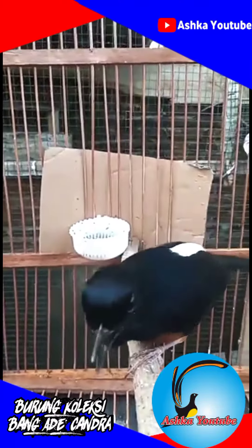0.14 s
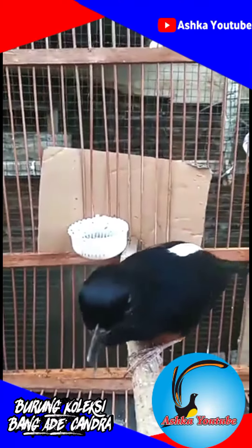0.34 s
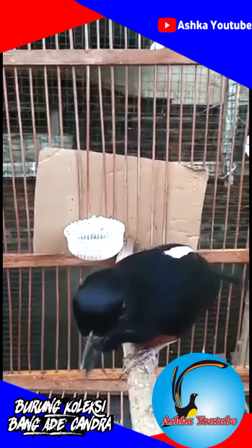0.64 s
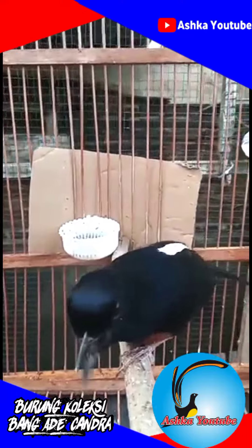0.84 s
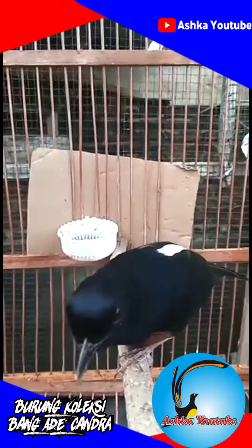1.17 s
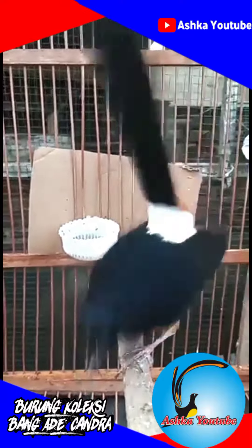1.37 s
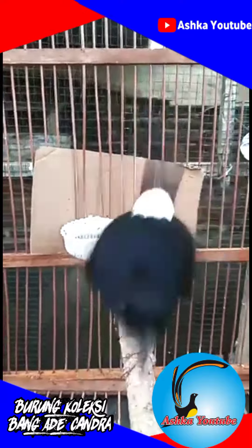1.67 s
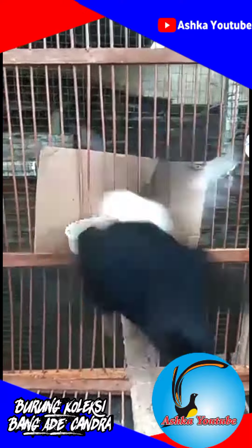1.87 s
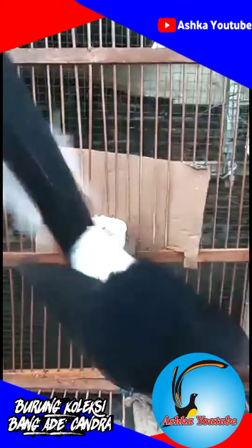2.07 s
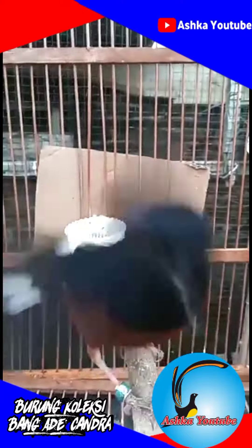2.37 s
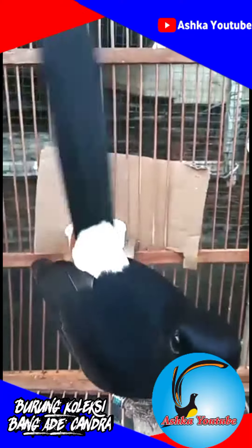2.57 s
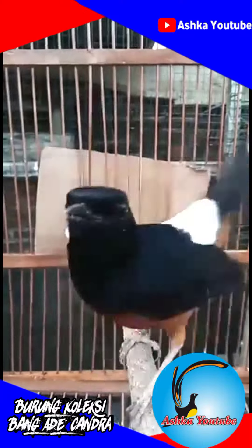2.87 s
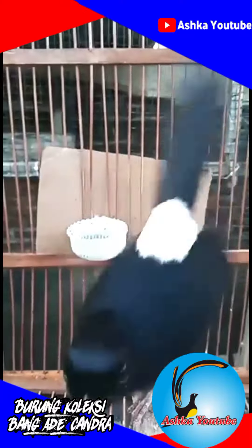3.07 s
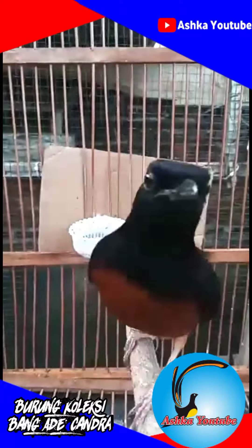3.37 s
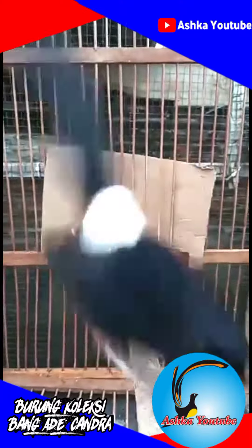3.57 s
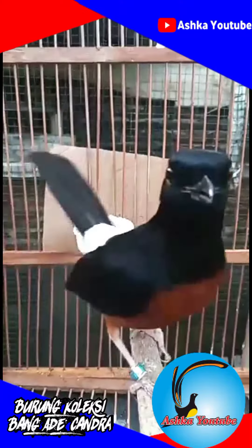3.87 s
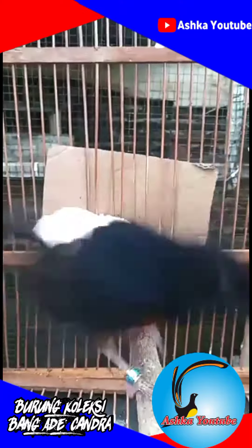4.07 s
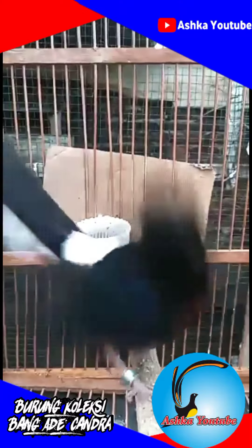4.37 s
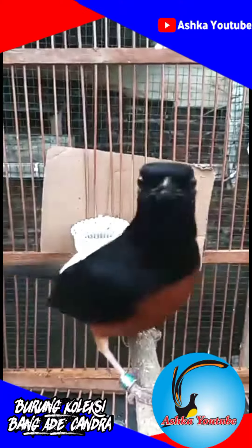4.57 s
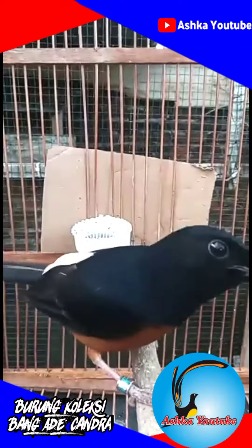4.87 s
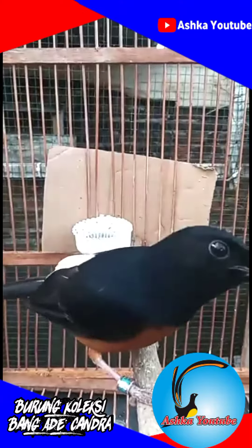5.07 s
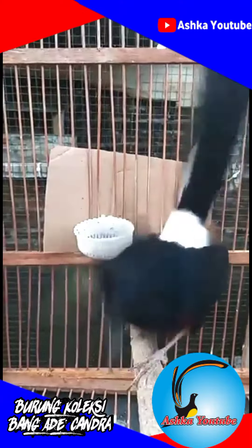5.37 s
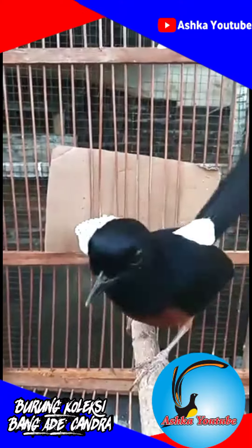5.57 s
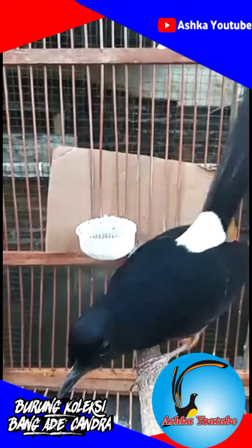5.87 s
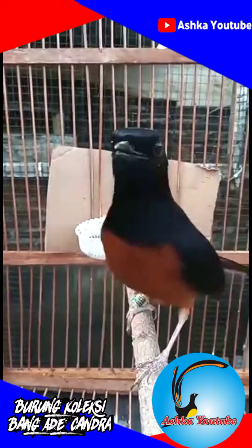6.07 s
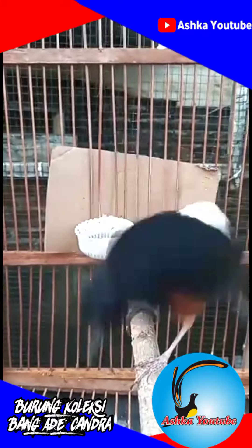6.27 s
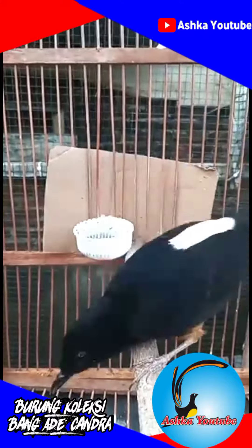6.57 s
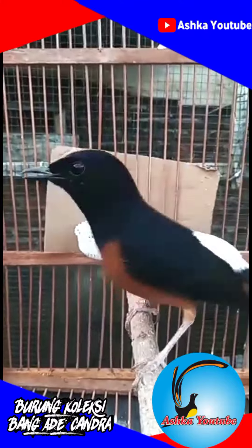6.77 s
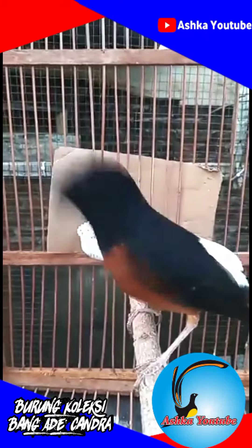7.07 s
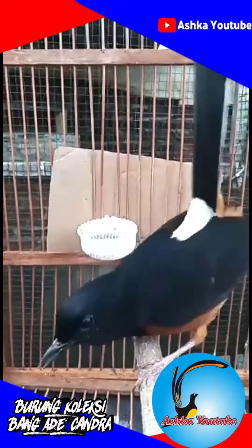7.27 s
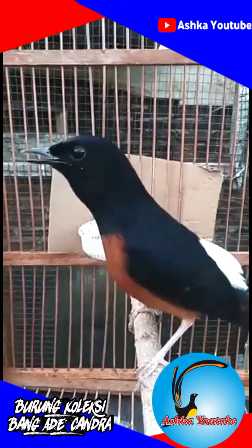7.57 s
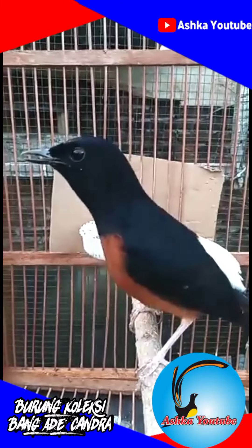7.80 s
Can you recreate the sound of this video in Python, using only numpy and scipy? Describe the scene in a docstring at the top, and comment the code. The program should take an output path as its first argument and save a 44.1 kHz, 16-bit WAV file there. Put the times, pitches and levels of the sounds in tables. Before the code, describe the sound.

A close caged songbird warbles rapidly, then alternates dry clicks with short rising whistles, and finally throws out piercing, scratchy upward squeals.

```python
"""Caged songbird close to a phone microphone

Close up, in a porch's echo: swinging tones warble, near-pure tones whistle and two coupled tones squeal.
Shaped noise makes the dry clicks, chopped throat rasps, breathy puffs, feather swishes and air thumps;
damped knocks are feet on the perch. Far off in the yard, soft tones make a dove and small birds, harmonics
a rooster and pulsed bands a trill, over a bed of patchy noise: traffic rumble, murmur and twitter.
"""
import sys
import numpy as np
from scipy import signal
from scipy.fft import rfft, irfft, next_fast_len
from scipy.io import wavfile
from scipy.ndimage import uniform_filter1d, map_coordinates

SR = 44100
rng = np.random.default_rng(int(sys.argv[2]) if len(sys.argv) > 2 else 0)


def int16_out(signal):
    """Quantize to a 16-bit WAV file."""
    q = np.round(np.clip(np.atleast_2d(signal).T, -1, 1) * 32767)
    wavfile.write(sys.argv[1], SR, q.astype(np.int16))


N = 350154  # samples

# Levels and spectra are relative: the functions add trims or set the noise to rms 1.
# Yard beds, spectra of traffic rumble, middle murmur and distant small birds: (frequency [Hz], level [dB])
RUMBLE_SPECTRUM = [(12, -53.5), (20, -39), (146, -1.5), (315, -8), (510, -14), (694, -28), (809, -19),
                   (1200, -36.5), (1560, -60.5), (2640, -120)]
MURMUR_SPECTRUM = [(410, -32), (700, -5), (806, -16.5), (2190, -3.5), (2380, -14.5), (3800, -8.5),
                   (4940, -25.5), (8360, -120)]
TWITTER_SPECTRUM = [(2000, -55), (3400, -31), (4090, -11.5), (5320, 6), (6270, -17), (6870, -8),
                    (7890, -10.5), (11000, -28.5), (13400, -29.5), (15600, -44.5), (16400, -60)]
# Rise and fall of the three beds: (time [s], level [dB])
RUMBLE_LEVEL = [(0, -58), (.8, -61.5), (1.3, -62), (2.8, -64.5), (3.2, -62), (4.1, -64), (5.1, -60),
                (5.9, -56), (6.2, -64), (6.4, -56.5), (7.05, -63), (7.94, -64)]
MURMUR_LEVEL = [(0, -53.5), (.5, -59.5), (1.5, -68), (2.8, -68.5), (4.3, -67.5), (5.9, -68.5), (7, -71.5),
                (7.94, -71)]
TWITTER_LEVEL = [(0, -59), (.95, -74.5), (2.79, -68.5), (3.16, -80.5), (3.78, -77), (4.02, -66),
                 (4.49, -77.5), (5.06, -57), (5.2, -64.5), (5.9, -71), (6.39, -52.5), (6.68, -57),
                 (6.81, -63), (7.43, -56), (7.61, -57.5), (7.94, -55)]

# Low close whistles, small birds far off, rising whistles, one short low note and far dove coos:
# (start [s], length [s], reference pitch [Hz], reference level [dB])
COOS = [(-.008, 0.039, 1184, -18), (0.15, 0.037, 1150, -15), (0.365, .042, 1131, -15),
        (0.6, 0.031, 1150, -16)]
PEEPS = [(0, 0.06, 4600, -49), (0.075, 0.036, 4730, -35.5), (0.145, 0.056, 4750, -38.5),
         (0.23, 0.034, 4820, -48), (0.3, 0.042, 4540, -47), (0.38, .03, 5500, -55),
         (0.54, .035, 4220, -43.5), (0.69, .04, 4120, -51.5), (0.92, 0.033, 5420, -45.5),
         (1.12, 0.026, 3664, -35.5), (1.98, 0.085, 4760, -55), (2.19, 0.09, 4810, -58),
         (2.65, 0.075, 5540, -57)]
WHISTLES = [(1.567, 0.17, 2300, -30), (1.893, 0.18, 2321, -31.5), (2.2, 0.18, 2320, -32),
            (2.503, 0.18, 2307, -32), (2.852, 0.19, 2296, -31.5), (3.348, .2, 2272, -31)]
CHIP = [(3.964, 0.022, 1444, -37.5)]
DOVE = [(1.36, 0.093, 1010, -56.5), (1.63, 0.11, 1000, -58), (2.03, 0.056, 540, -58),
        (2.55, 0.15, 1190, -60.5), (3.11, 0.082, 625, -51.5), (3.24, .1, 648, -49.5),
        (3.37, 0.059, 655, -57.5), (3.48, 0.18, 635, -55.5), (6.105, 0.053, 1060, -60.5)]
# Their shapes; the rising whistle is a low step, a jump, then a slowing climb:
# (share of length [0-1], pitch ratio [1], relative level [dB])
COO_SHAPE = [(0, 0.9, -14), (.25, 0.98, -4), (.45, 0.98, 2.5), (.8, 0.95, -3), (1, 0.91, -10)]
PEEP_SHAPE = [(0, 1, -14), (.5, 1, 3.5), (1, 0.94, -11.5)]
WHISTLE_SHAPE = [(0, .7, -21), (.08, .72, -2.5), (0.171, .72, -9.5), (0.199, 0.99, -26.5),
                 (.25, 0.79, -8.5), (.32, .91, -4), (.42, 0.92, -1.5), (.6, 0.96, -3.5), (.83, 0.98, -7),
                 (1, 0.96, -30)]
CHIP_SHAPE = [(0, 1.33, -29), (.3, 1.05, 0), (.8, .96, -1.5), (1, .93, -22)]
DOVE_SHAPE = [(0, .98, -3.5), (.3, 1, -4), (1, 1.02, -10)]
# One rising dove coo and one far rising note: (time [s], pitch [Hz], level [dB])
DOVE_RISE = [
    [(4.7, 621, -66.5), (4.826, 811, -47.5), (4.9, 799, -67.5)],
]
FAR_RISE = [
    [(5.52, 1789, -65.5), (5.598, 2260, -58), (5.65, 2290, -61)],
]

# Warbled phrases: (time [s], centre pitch [Hz], level [dB])
WARBLES = [
    [(0.032, 1920, -13.5), (0.068, 1932, -8), (0.1, 1252, -19.5)],
    [(0.193, 2140, -12), (0.225, 1870, -8), (0.254, 1377, -16.5), (0.262, 2485, -28), (0.279, 2376, -7),
     (0.318, 1400, -18.5)],
    [(0.408, 2017, -12), (0.444, 1831, -6.5), (0.478, 1509, -17), (0.498, 2430, -9), (0.555, 2207, -23.5)],
    [(0.633, 1904, -9.5), (0.671, 1965, -7.5), (0.697, 1578, -16.5)],
    [(0.736, 3076, -18.5), (0.743, 2796, -9), (0.775, 2008, -11.5), (0.805, 1690, -14.5),
     (0.82, 2474, -13.5), (0.845, 3652, -11), (0.857, 3810, -12.5), (0.872, 3360, -26)],
    [(0.956, 2222, -15.5), (0.979, 1795, -6.5), (1.01, 1516, -18.5), (1.035, 2520, -12),
     (1.055, 2990, -13.5), (1.07, 2995, -23.5)],
]
# How much of the full wobble each phrase takes: (share [0-1])
WARBLE_SHARE = [0.55, 0.99, .65, 0.26, .7, 0.34]
# Faint flutters above the whistle ends: (start [s], length [s], reference pitch [Hz], reference level [dB])
FLUTTERS = [(1.72, 0.074, 2537, -32), (2.045, 0.038, 2517, -35.5), (2.348, 0.057, 2530, -38.5),
            (2.63, 0.072, 2523, -39), (3.0, 0.043, 2534, -54.5)]
# Shape of a flutter: (share of length [0-1], pitch ratio [1], relative level [dB])
FLUTTER_SHAPE = [(0, .98, -6), (.25, 1, 2), (0.998, 1.02, -27.5)]
# Thin treble and octave overtone under the tone: (pitch [Hz], relative level [dB])
TREBLE_BY_PITCH = [(1300, -40.5), (1650, -30), (1900, -20.5), (2400, -14.5), (4000, -18.5)]
OCTAVE_BY_PITCH = [(1500, -39), (3000, -35), (3800, -18.5)]
# Thin treble noise over the warbles: (frequency [Hz], level [dB])
WARBLE_TREBLE_SPECTRUM = [(1760, -37), (3000, -17), (3710, -15.5), (4340, -23), (6020, -26), (9610, -25.5),
                          (10400, -7.5), (12200, -8), (15400, -31.5), (16400, -58)]
WARBLE_HZ, WARBLE_DEPTH_HZ = 97.35, 252  # mean teeth a second; pitch swing per unit of tooth at share 1
FLUTTER_SHARE, FLUTTER_TREBLE_DB = 0.34, -36  # share of the full wobble; treble relative to the tone
THIN_HZ = 10400  # mean pitch of a thin, unsteady treble tone, heard also shifted up by the song pitch

# Feather swishes, and at 1.12 s a breathy noise under a short high note: (peak time [s], rise time [s], fall
# time [s], level [dB])
SWISHES = [(0.6, 0.086, 0.091, -34.5), (0.94, 0.028, .02, -46), (1.12, .05, 0.021, -37.5),
           (1.31, 0.11, 0.079, -36.5), (3.81, .03, 0.037, -57)]
# Thumps of pushed air: (peak time [s], rise time [s], fall time [s], level [dB], brighter flap level [dB])
THUMPS = [(0.62, .12, 0.046, -57, -42), (1.294, 0.051, .14, -48.5, -42.5), (3.645, 0.055, 0.11, -51.5, -52),
          (3.8, 0.023, 0.041, -36, -47.5), (3.869, .2, 0.16, -43.5, -64), (4.65, 0.091, 0.12, -56, -65.5),
          (5.299, 0.047, 0.042, -63, -43.5), (5.33, 0.19, 0.13, -47, -68), (7.4, 0.18, 0.28, -40, -52.5)]
# Feet on the perch: (time [s], level [dB])
KNOCKS = [(0.692, -29.5), (0.743, -47), (0.961, -37.5), (1.027, -46.5), (3.802, -34), (5.292, -35.5)]
# Spectra of feathers, low thump and brighter flap: (frequency [Hz], level [dB])
FEATHER_SPECTRUM = [(2000, -45.5), (3400, -8), (4420, -5.5), (7290, -4.5), (11200, -12), (14900, -10.5),
                    (15900, -16.5), (16400, -83)]
THUMP_SPECTRUM = [(24, -44), (45, -21), (100, -7.5), (190, 1.5), (300, -1.5), (450, -18.5), (800, -39.5),
                  (1500, -100)]
FLAP_SPECTRUM = [(150, -60.5), (280, -12.5), (450, 0.5), (800, -1.5), (1150, -17), (1800, -34),
                 (3300, -100)]
SWELL_DB, KNOCK_HZ = 26, 482  # drop of a swell over one rise or fall time; knock frequency

# Left side of two separate two-voiced notes: (time [s], pitch [Hz], level [dB], octave level [dB])
LEFT_NOTES = [
    [(1.205, 2592, -50.5, -74), (1.225, 2644, -32, -82), (1.3, 2660, -40.5, -51.5),
     (1.37, 2660, -30.5, -75), (1.44, 2646, -61, -99)],
    [(5.42, 2917, -47, -91), (5.444, 2893, -33.5, -48.5), (5.478, 3122, -47, -44), (5.586, 4196, -26, -44),
     (5.61, 4444, -44, -64)],
]
# Right side of those notes: (time [s], pitch [Hz], level [dB], treble level [dB])
RIGHT_NOTES = [
    [(1.21, 2947, -40, -90), (1.22, 3113, -41.5, -76.5), (1.288, 3109, -41.5, -57),
     (1.33, 2993, -35.5, -60), (1.43, 2876, -63, -90)],
    [(5.465, 5500, -48.5, -56), (5.49, 4958, -32, -58), (5.505, 5190, -31.5, -61), (5.53, 5414, -40.5, -68),
     (5.58, 5846, -56, -74), (5.62, 6142, -68, -70)],
]
# Right side of the rising squeals: (time [s], pitch [Hz], level [dB])
SQUEALS = [
    [(4.879, 4183, -51), (4.897, 4735, -21), (5.031, 6734, -37), (5.055, 6950, -46.5)],
    [(6.016, 4278, -39), (6.03, 4790, -24), (6.092, 5430, -25.5), (6.15, 5960, -24.5), (6.186, 6300, -32.5),
     (6.22, 6720, -30.5), (6.275, 6560, -33), (6.289, 5680, -24), (6.33, 5245, -33.5)],
    [(6.842, 4378, -42), (6.861, 5080, -25), (6.961, 5920, -24.5), (7.0, 6056, -33.5), (7.104, 6800, -30.5),
     (7.14, 6620, -23.5), (7.15, 6304, -23)],
    [(7.6, 4827, -39), (7.616, 5112, -20.5), (7.644, 5467, -24), (7.724, 6137, -30.5), (7.772, 6840, -28),
     (7.8, 7051, -41)],
]
# What goes with the right pitch: (pitch [Hz], left level [dB], left octave level [dB], treble level [dB])
SQUEAL_COLOUR = [(4000, -87.5, -62, -65), (4200, -51, -48, -64), (5300, -56, -64, -66.5),
                 (5870, -57.5, -50.5, -53.5), (6080, -47.5, -54, -35.5), (6590, -45.5, -33, -38),
                 (6870, -66, -57, -51)]
# Right pitch over left pitch in each squeal, before left dips are held up: (ratio [1])
SIDES_APART = [1.66, 1.64, 1.61, 1.57]
# Tones made where the sides couple: (multiple of left pitch [1], multiple of right pitch [1], level [dB])
MIXING = [(3, 0, -30), (1, 1, -7), (-1, 2, -22), (0, 2, -9.5), (2, 1, -17)]
# The beak's response to the coupled tones: (frequency [Hz], gain [dB])
BEAK_RESPONSE = [(1000, -22), (6000, -19), (8500, 11), (9600, -5), (10500, -24), (12500, -15), (14000, -15),
                 (15000, -41)]
# Patchy treble noise over the squeals: (frequency [Hz], level [dB])
SQUEAL_TREBLE_SPECTRUM = [(6350, -78.5), (10800, -49.5), (11600, 6), (13100, 17.5), (13900, 5),
                          (15800, -37), (16400, -83)]
SQUEAL_ROUGH = 0.59  # share of full roughness, 0-1

# Dry clicks: (time [s], peak level [dB], low part level [dB])
CLICKS = [(1.4854, -11.5, -17.5), (1.7109, -9, -16), (1.933, -5, -20), (2.468, -6.5, -15.5),
          (2.831, -6, -26.5), (3.0758, -7.5, -15), (3.6085, -4.5, -18), (5.2532, -7, -22.5),
          (5.7771, -5.5, -16.5), (6.864, -32.5, -33.5), (7.614, -26.5, -27)]
# Colour of the clicks: (frequency [Hz], level [dB])
SNAP_SPECTRUM = [(290, -53), (500, -33), (910, -1.5), (2120, -12.5), (3860, -11), (4530, -17), (6920, 0.5),
                 (7550, -9.5), (8740, -4.5), (10900, -29), (12600, -13), (15200, -30), (16400, -46)]

# Harsh rasps: (time [s], level [dB])
RASPS = [
    [(4.61, -46), (4.628, -20.5), (4.646, -22), (4.654, -32), (4.662, -16.5), (4.69, -47)],
    [(7.525, -35), (7.539, -17.5), (7.577, -20), (7.6, -37.5)],
]
# Throat noise: (frequency [Hz], level [dB])
THROAT_SPECTRUM = [(290, -76), (500, -39), (690, -20.5), (969, -4.5), (1310, 3.5), (1760, -1.5),
                   (2100, -13), (2280, -6), (2740, -24.5), (3030, -19), (3810, -50), (4500, -45),
                   (5850, -69), (9900, -120)]
RASP_TREBLE_DB = -22

# Far rooster: (time [s], pitch [Hz], level [dB])
ROOSTER = [
    [(5.24, 807, -57), (5.276, 861, -53), (5.338, 805, -59), (5.55, 799, -57)],
    [(5.575, 453, -59.5), (5.641, 505, -59.5), (5.83, 507, -54), (5.947, 481, -62), (6.09, 524, -69)],
    [(7.4, 553, -68), (7.48, 578, -54), (7.535, 586, -36)],
]
# Harmonics that carry from the crow: (harmonic number [1], level [dB])
CROW_HARMONICS = [(2, -5.5), (3, -5.5), (4, -9), (5, -11.5)]
# Distance takes the top off the crow: (frequency [Hz], gain [dB])
CROW_DISTANCE = [(2500, 3), (3100, -9)]

# Breathy ends of the long squeals: (start [s], length [s], reference level [dB])
PUFFS = [(6.285, 0.039, -28.5), (7.145, 0.032, -31)]
# Fade of a puff: (share of length [0-1], relative level [dB])
PUFF_FADE = [(0, 1.5), (1, -18.5)]
# Unvoiced air: (frequency [Hz], level [dB])
PUFF_SPECTRUM = [(1500, -48.5), (2200, -32.5), (5500, 9), (9000, -1), (10200, -37), (12500, -4),
                 (14500, -44)]

# Far trilling bird: (start [s], length [s], reference level [dB])
TRILL = [(6.36, 0.71, -57), (7.2, 0.37, -56.5), (7.82, .12, -47.5)]
# Fade of a trill: (share of length [0-1], relative level [dB])
TRILL_FADE = [(0, 6), (.4, -4), (.9, -7.5), (1, -13)]
# Bands of the trill: (centre pitch [Hz], relative level [dB])
TRILL_BANDS = [(5450, 7), (6650, 1), (7200, -0.5), (9000, -11)]
TRILL_HZ = 20.54  # notes a second

# Decay of the porch's answer: (frequency [Hz], time to fall 60 dB [s])
WALL_DECAY = [(500, 0.083), (2000, 0.12), (5500, 0.28), (9000, 0.19), (14000, 0.017)]
TOP_HZ = 16500  # band limit of the microphone


def amp(db):
    """Gain of a level in dB."""
    return 10 ** (np.asarray(db) / 20)


def unit(x):
    """x at rms 1."""
    return x / np.sqrt(np.mean(x ** 2) + 1e-20)


def along(points, hz):
    """Value at hz, from (Hz, value) points joined on a log frequency axis."""
    f, v = np.transpose(points)
    return np.interp(np.log(hz + 1), np.log(f + 1), v)


def notes(tables, edge=0.0016):
    """A gate with soft edges of edge seconds, then a smooth curve for each column after the time."""
    t = np.arange(N) / SR
    gate = np.zeros(N)
    for rows in tables:
        start, end = rows[0][0], rows[-1][0]
        on = slice(max(round((start - edge) * SR), 0), round((end + edge) * SR))
        nearest_end = np.minimum(t[on] - start, end - t[on])
        gate[on] += np.clip(nearest_end / edge + .5, 0, 1)  # touching notes cross-fade
    rows = np.concatenate(tables)
    s, *values = rows[np.argsort(rows[:, 0], kind="stable")].T
    curves = (uniform_filter1d(np.interp(t, s, v), size=130) for v in values)
    return np.minimum(gate, 1), *curves


def sung(events, shape):
    """One table per event: the shape stretched to its length, moved to its pitch (if any) and level."""
    return [[(s + length * share, *np.multiply(hz, ratio), db + rel_db) for share, *ratio, rel_db in shape]
            for s, length, *hz, db in events]


def swells(events):
    """The sum of gains that climb to a peak and die away, straight in dB."""
    t = np.arange(N) / SR
    return sum(amp(db - SWELL_DB * np.maximum((s - t) / abs(rise), (t - s) / abs(fall)))
               for s, rise, fall, db in events)


def wobble(rate):
    """A smooth random curve, rate knots a second."""
    knots = rng.standard_normal(int(N * rate / SR) + 4)
    return map_coordinates(knots, [np.arange(N) * rate / SR])


def phase(hz):
    """Running phase of a pitch curve."""
    return 2 * np.pi * np.cumsum(hz) / SR


def filtered(x, response):
    """x times a response of frequency."""
    m = next_fast_len(N + 8192)
    return irfft(rfft(x, m) * response(np.fft.rfftfreq(m, 1 / SR)), m)[:N]


def hiss(spectrum, patchy_db=0, tall=4, long=10):
    """Coloured noise of rms 1; patches of random gain, tall in bins and long in frames, mottle it."""
    z = signal.stft(rng.standard_normal(N), nperseg=512)[2]
    field = uniform_filter1d(rng.standard_normal(z.shape), tall, 0)
    field = uniform_filter1d(field, long, 1)
    noise = signal.istft(z * amp(patchy_db * unit(field)), nperseg=512)[1][:N]
    return unit(filtered(noise, lambda hz: amp(along(spectrum, hz))))


def yard():
    """Low traffic rumble, a soft middle murmur and thin streaks of distant small birds, all patchy noise."""
    t = np.arange(N) / SR
    levels = (RUMBLE_LEVEL, MURMUR_LEVEL, TWITTER_LEVEL)
    rumble_db, murmur_db, twitter_db = (np.interp(t, *np.transpose(v)) for v in levels)
    rumble = amp(rumble_db + 0.72 * wobble(4.5)) * hiss(RUMBLE_SPECTRUM, patchy_db=6, tall=2)
    murmur = amp(murmur_db) * hiss(MURMUR_SPECTRUM, patchy_db=4, tall=2, long=14)
    twitter = amp(twitter_db) * hiss(TWITTER_SPECTRUM, patchy_db=5, tall=2, long=16)
    return rumble + murmur + twitter


def whistle(tables, overtones, unsteady_db, jitter_hz):
    """A near-pure tone, unsteady in pitch and level, with a few weak, flickering overtones."""
    gate, hz, db = notes(tables, edge=.009)
    angle = phase(hz + jitter_hz * wobble(80))
    tone = np.sin(angle) + sum(amp(level) * wobble(220) * np.sin(k * angle) for k, level in overtones)
    flicker_db = unsteady_db * (.6 * wobble(35) + .8 * wobble(110))
    return gate * amp(db + 6 + flicker_db) * tone


def warbles():
    """One tone whose pitch swings in quick saw-like teeth; each tooth swells, under a thin unsteady treble."""
    phrases = [[(s, hz, db, db + along(TREBLE_BY_PITCH, hz), share) for s, hz, db in rows]
               for rows, share in zip(WARBLES, WARBLE_SHARE)]
    flutters = [[(s, hz, db, db + FLUTTER_TREBLE_DB, FLUTTER_SHARE) for s, hz, db in rows]
                for rows in sung(FLUTTERS, FLUTTER_SHAPE)]
    gate, hz, db, treble_db, share = notes(phrases + flutters, edge=.004)
    beat = phase(WARBLE_HZ * (1 + .22 * wobble(45)))
    tooth = np.sin(beat) + 0.48 * np.sin(2 * beat)
    swell = amp(share * (3.4 * (np.cos(beat - 1.2) - .5) + 5.3 * wobble(150)))
    angle = phase(hz + WARBLE_DEPTH_HZ * share * tooth + 70 * wobble(300))
    octave = amp(along(OCTAVE_BY_PITCH, hz)) * np.sin(2 * angle)
    tone = np.sin(angle) + octave + amp(-36.5) * np.sin(4 * angle)
    thin = phase(THIN_HZ + 160 * wobble(630))
    thin_tones = amp(-5) * np.sin(thin) + np.sin(thin + angle)  # the second sits one song pitch higher
    treble_noise = amp(-3.5) * hiss(WARBLE_TREBLE_SPECTRUM, patchy_db=5.5)
    treble = amp(3.1 * wobble(140)) * thin_tones + treble_noise
    return gate * swell * (amp(db + 2) * tone + amp(treble_db) * treble)


def wings():
    """Feathers swish while pushed air thumps on the microphone; feet knock the perch as damped rings."""
    swish = swells(SWISHES) * hiss(FEATHER_SPECTRUM, patchy_db=2.5)
    thump = swells(row[:4] for row in THUMPS) * hiss(THUMP_SPECTRUM, patchy_db=2.5)
    flap = swells((*row[:3], row[4]) for row in THUMPS) * hiss(FLAP_SPECTRUM)
    out = swish + amp(1.8 * wobble(30)) * (thump + flap)
    u = 2 * np.pi * KNOCK_HZ * np.arange(SR // 50) / SR
    knock = 2 * u * (2 - u) * np.exp(-u)
    for s, db in KNOCKS:
        out[round(s * SR):][:len(u)] += amp(db + 7.5) * knock
    return out


def two_sides():
    """Tables for both sides: in the squeals the left side follows the right one, and pitch sets the colour."""
    pitch, *colours = np.transpose(SQUEAL_COLOUR)
    left_db, octave_db, treble_db = (lambda hz, c=c: np.interp(hz, pitch, c) for c in colours)
    left, right = [], []
    for rows, apart in zip(SQUEALS, SIDES_APART):
        times, pitches, levels = np.transpose(rows)
        s = np.linspace(times[0], times[-1], num=40)
        hz, db = np.interp(s, times, pitches), np.interp(s, times, levels)
        left_hz = np.maximum.accumulate(hz) / apart  # the left side never drops
        left.append(np.transpose([s, left_hz, left_db(hz), octave_db(hz)]))
        right.append(np.transpose([s, hz, db, treble_db(hz)]))
    return LEFT_NOTES + left, RIGHT_NOTES + right


def squeals():
    """Both sides of the syrinx sound at once; their coupling adds sums and differences of the two pitches."""
    left_rows, right_rows = two_sides()
    left_gate, left_hz, left_db, octave_db = notes(left_rows)
    right_gate, right_hz, right_db, treble_db = notes(right_rows)
    left = phase(left_hz + 60 * SQUEAL_ROUGH * wobble(400))
    right = phase(right_hz + 120 * SQUEAL_ROUGH * wobble(400))
    left_size = left_gate * amp(left_db + 5 + 6 * SQUEAL_ROUGH * wobble(120))
    right_size = right_gate * amp(right_db + 7.5 + 5.2 * SQUEAL_ROUGH * wobble(120))
    octave = left_gate * amp(octave_db + 7.5 + 7.1 * wobble(100)) * np.sin(2 * left)
    apart = np.clip(right_hz / left_hz - 1.25, 0, .1) * 10  # close pitches do not couple
    mixed = np.zeros(N)
    for a, b, db in MIXING:
        size = np.sqrt(left_size * right_size) if b else left_size
        mixed += amp(db + 1.3 * wobble(60)) * size * np.sin(a * left + b * right)
    coupled = filtered(apart * mixed, lambda hz: amp(along(BEAK_RESPONSE, hz)))
    voiced = left_size * np.sin(left) + right_size * np.sin(right) + octave + coupled
    treble = right_gate * amp(treble_db) * hiss(SQUEAL_TREBLE_SPECTRUM, patchy_db=8.5, tall=3, long=7)
    return voiced + treble


def clicks():
    """A burst of a few ms and a short cage tail, coloured by one spectrum plus random variation per click."""
    out, t = np.zeros(N + SR), np.arange(SR // 8) / SR
    hz = np.fft.rfftfreq(len(t), 1 / SR)
    snap = (1 - np.exp(-(t / 0.001) ** 2)) * amp(-60 * t / 0.01)
    cage_tail = amp(-24 - 60 * t / 0.1) * (t < .1)
    delay = np.exp(-2j * np.pi * hz * .008)  # leaves space for the lead-in
    for s, db, low_db in CLICKS:
        variation_db = 3 * np.interp(hz, np.linspace(0, SR / 2, 30), rng.standard_normal(30))
        colour = along(SNAP_SPECTRUM, hz) + (low_db + 14) * (hz < 2500) + variation_db
        noise = (snap + cage_tail) * rng.standard_normal(len(t))
        burst = irfft(rfft(noise) * amp(colour) * delay, len(t))
        out[round((s - .0085) * SR):][:len(t)] += amp(db) * burst / np.abs(burst).max()
    return out[:N]


def rasps():
    """Noise in the throat, chopped by uneven pulses, with a little treble noise."""
    gate, db = notes(RASPS)
    pulses = phase(70 * (1 + .4 * wobble(60)))
    chop = amp(3.5 * np.cos(pulses) + 2.5 * wobble(200))
    treble = amp(RASP_TREBLE_DB) * hiss(FEATHER_SPECTRUM, patchy_db=-2.5)
    return gate * amp(db) * unit(chop) * (hiss(THROAT_SPECTRUM) + treble)


def rooster():
    """A far, hoarse crow: only the middle harmonics carry, each fading in and out."""
    gate, hz, db = notes(ROOSTER, edge=0.018)
    angle = phase(hz + 9 * wobble(90))
    crow = np.zeros(N)
    for k, level in CROW_HARMONICS:
        fading_db = 5 * wobble(20) + 3 * wobble(90)
        crow += amp(level + along(CROW_DISTANCE, k * hz) + fading_db) * np.sin(k * angle)
    return gate * amp(db) * crow


def puffs():
    """Air escapes unvoiced as the syrinx lets go."""
    gate, db = notes(sung(PUFFS, PUFF_FADE))
    return gate * amp(db + 3) * hiss(PUFF_SPECTRUM, patchy_db=4)


def trill():
    """Short, fuzzy notes at a steady pace: unsteady tones switched by a clipped cosine."""
    gate, db = notes(sung(TRILL, TRILL_FADE), edge=0.027)
    pace = np.clip(0.86 + np.cos(2 * np.pi * TRILL_HZ * (np.arange(N) / SR - 6.62)), 0, 1)
    bands = sum(amp(level) * wobble(90) * np.sin(phase(hz + 60 * wobble(82))) for hz, level in TRILL_BANDS)
    return gate * amp(db) * pace * bands


def walls(x):
    """Each frequency of the porch's answer dies at its own speed; each overlapping piece gets a fresh tail."""
    out, hop = np.zeros(N + SR), SR // 8
    fade = np.sin(np.pi * np.arange(2 * hop) / (2 * hop)) ** 2
    padded = np.pad(x, (hop, hop))
    for start in range(0, N, hop):
        hz, t, z = signal.stft(rng.standard_normal(SR // 3), SR, nperseg=256)
        decay = amp(-60 * t / along(WALL_DECAY, hz)[:, None])
        tail = signal.istft(z * decay, SR, nperseg=256)[1]
        piece = padded[start:][:2 * hop]
        wet = signal.fftconvolve(piece * fade[:len(piece)], tail / np.linalg.norm(tail))
        out[start:][:len(wet)] += wet
    return np.pad(out[hop:], (150, 0))[:N]  # the answer starts 150 samples late


def scene():
    """The singer close by in the porch's echo, the far callers, wings and yard."""
    coos = whistle(sung(COOS, COO_SHAPE), [(2, -20.5), (4, -33.5), (5, -26), (6, -25), (8, -28.5)],
                   unsteady_db=1.03, jitter_hz=28)
    peeps = whistle(sung(PEEPS, PEEP_SHAPE) + FAR_RISE, [(1.8, -15)], unsteady_db=5, jitter_hz=60)
    rising = whistle(sung(WHISTLES, WHISTLE_SHAPE) + sung(CHIP, CHIP_SHAPE),
                     [(2, -30.5), (3, -51), (4, -46.5), (5, -43.5)], unsteady_db=3, jitter_hz=21.9)
    dove = whistle(sung(DOVE, DOVE_SHAPE) + DOVE_RISE, [(2, -29.5)], unsteady_db=4, jitter_hz=33)
    song = coos + warbles() + rising + squeals() + rasps() + puffs()
    far = dove + rooster() + trill()
    snaps = clicks()
    echo = walls(amp(-13.5) * peeps + amp(-8) * song + amp(-35) * snaps + amp(-4.5) * far)
    return (song + snaps + far + peeps + echo + wings() + yard())[None]


def record(dry):
    """The phone microphone rounds off high peaks, adds faint hiss, dulls the top and stops at its band limit."""
    rounded = dry[0] / (1 + np.abs(dry[0] / .93) ** 6) ** (1 / 6)
    noisy = rounded + amp(-77.5) * rng.standard_normal(N)

    def colour(hz):
        return amp(along([(14500, -0.5), (16000, -8)], hz)) * (hz < TOP_HZ)

    return filtered(noisy, colour)[None]


dry = scene()
out = record(dry)
int16_out(out)
```